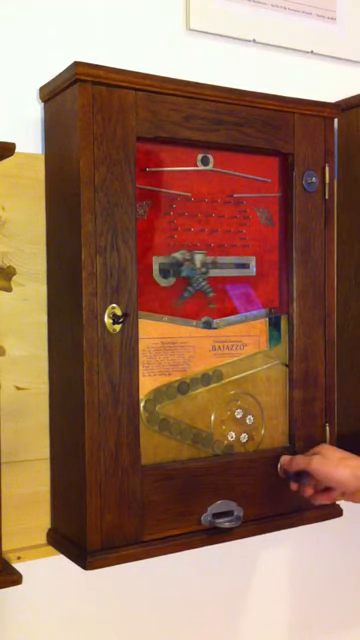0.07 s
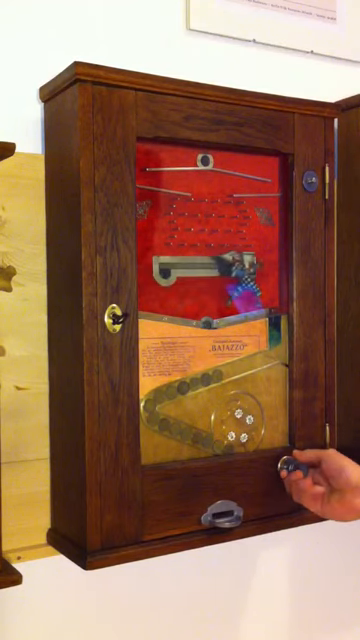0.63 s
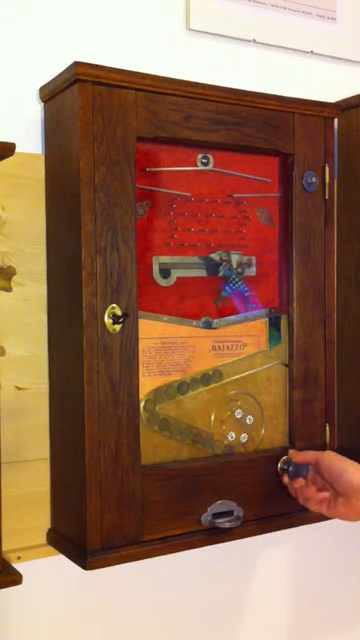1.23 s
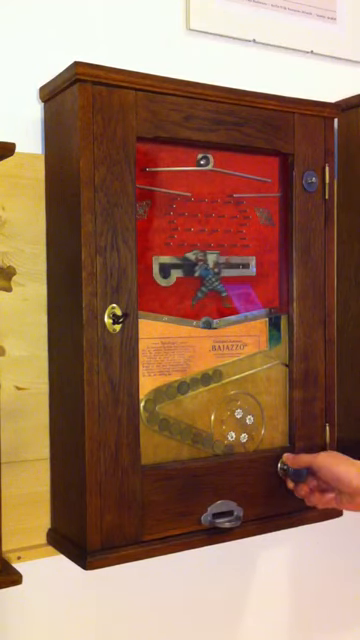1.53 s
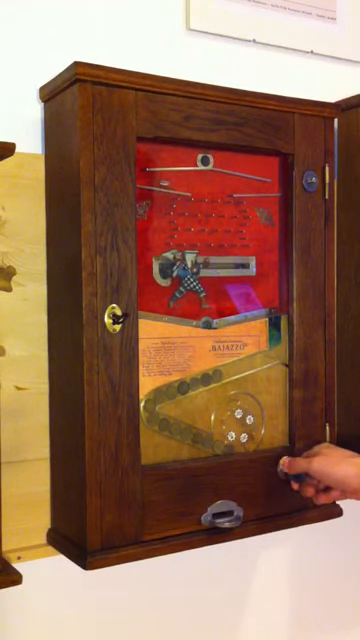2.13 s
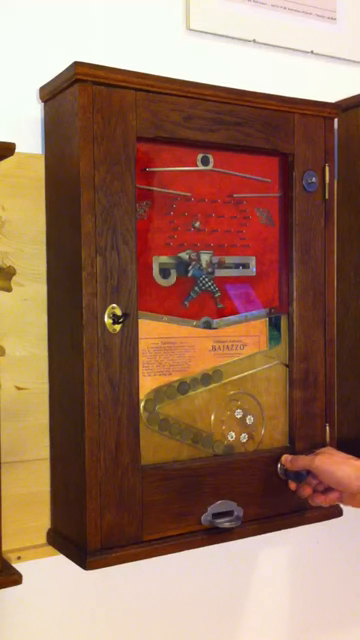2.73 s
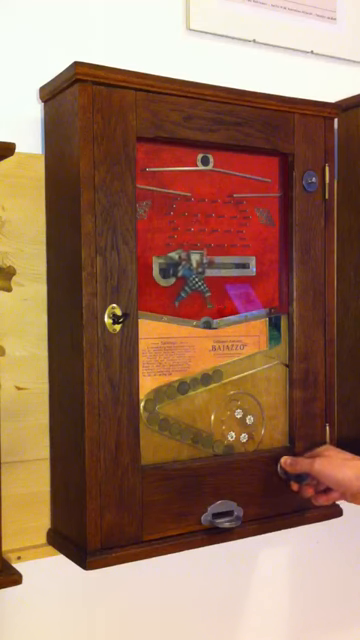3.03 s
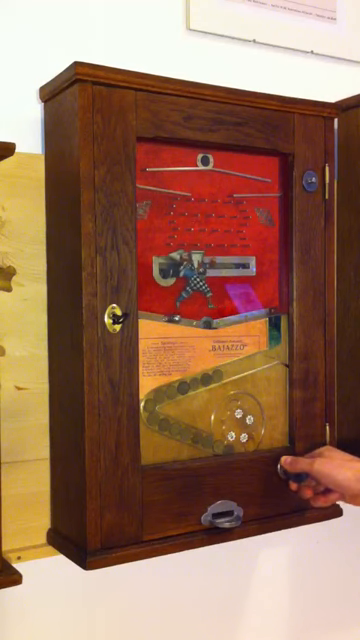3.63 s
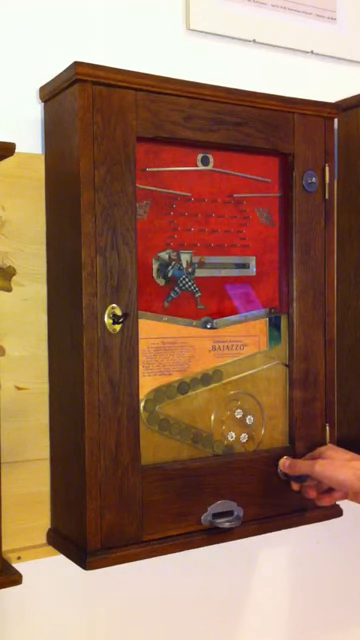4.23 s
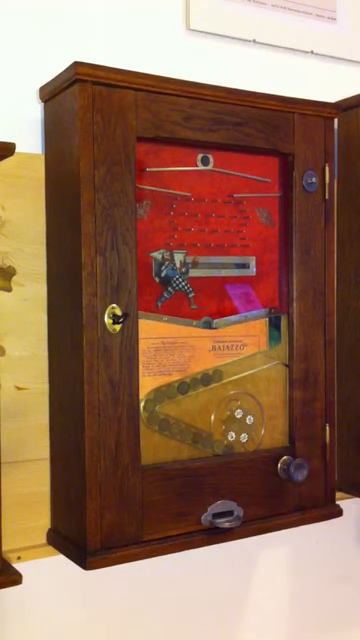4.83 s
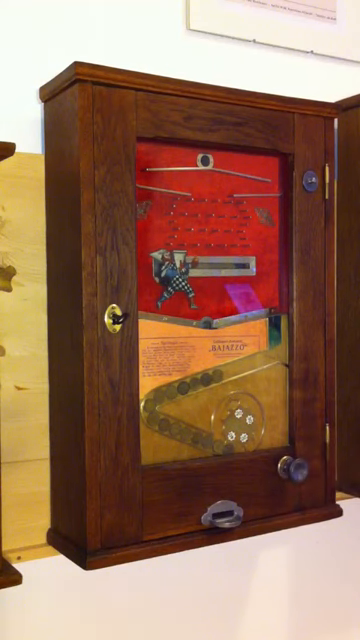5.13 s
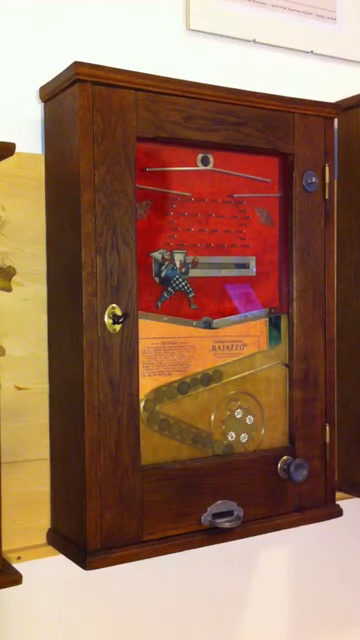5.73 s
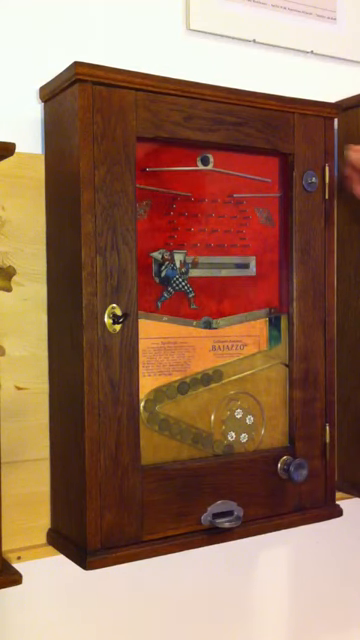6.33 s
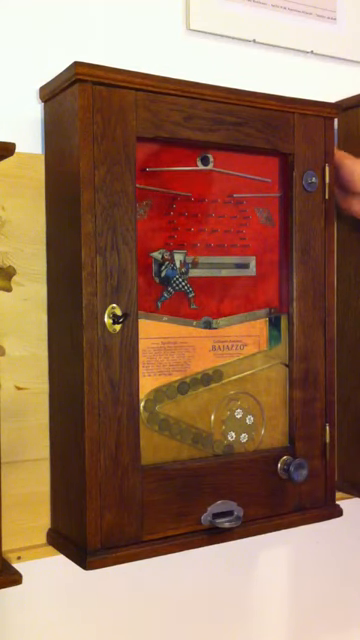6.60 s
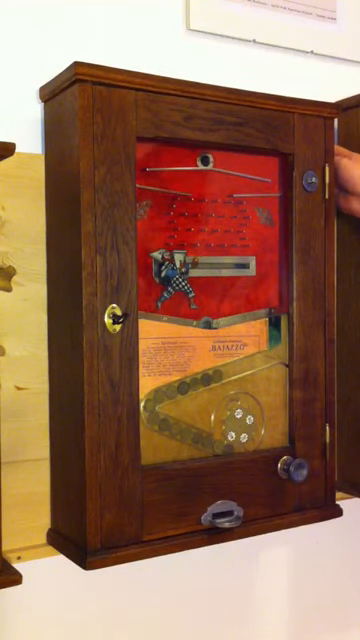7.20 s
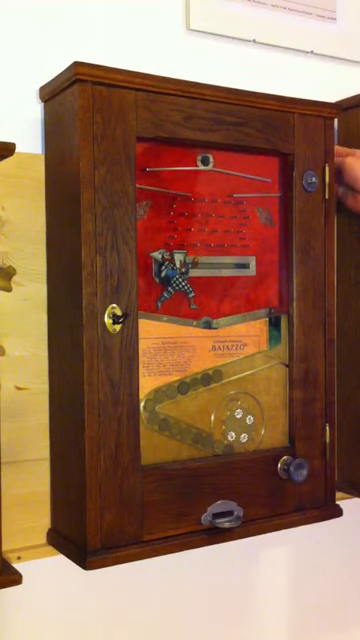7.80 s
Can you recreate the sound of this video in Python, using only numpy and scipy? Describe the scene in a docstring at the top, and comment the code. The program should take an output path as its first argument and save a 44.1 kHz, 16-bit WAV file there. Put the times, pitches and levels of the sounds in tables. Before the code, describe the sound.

An old wooden coin game is heard from about a metre away in a bare, quiet room with a short echo. From 0.4 seconds, levers click and knock hollowly inside the case, with faint metal scraping. At 1.4 seconds a steel ball is freed with a sharp, ringing clink, followed by a lighter one and a knock near 2.1. The ball lands on a rail at 2.4, rolls with a brief rumble and thin ring, and ticks through pins around 2.8 to 3 seconds. At 3.3 it drops onto metal with the loudest clack, then bounces with smaller clinks until about 4.4. Levers knock at 4.6 and rattle to rest around 5.1. After a lull with only faint hush, a coin clicks lightly in the slot from 6.7 seconds and clatters down the chute at about 7.4 and again near 7.9.

```python
"""A bare, quiet room, with one small microphone a metre from an old coin game in an oak wall cabinet.
A knob slides the catcher and frees a steel ball, which rolls down rails, ticks through pins and drops
onto metal, ringing each part it strikes. Levers knock inside, with the case as their sounding board.
At the end a hand feeds a coin into the slot at the side, and it clatters down the chute."""
import sys
import numpy as np
from scipy import signal
from scipy.fft import rfft, irfft
from scipy.io import wavfile
from scipy.ndimage import uniform_filter1d, map_coordinates

SR = 44100
rng = np.random.default_rng(int(sys.argv[2]) if len(sys.argv) > 2 else 0)


def master(y):
    """Save y as 16-bit WAV."""
    cut = np.clip(np.atleast_2d(y).T, -1, 1)
    pcm = np.round(cut * 32767)  # scale
    wavfile.write(sys.argv[1], SR, pcm.astype(np.int16))


N = 351036
T = np.arange(N) / SR
RING = T[:SR // 5]  # time axis of one ring-out, in seconds


# The ball's strikes, with a quick slap just after the two hardest (at 1.433 and 3.3156 s), probably
# off a nearby wall. At 2.4215 s the ball lands on the steel rail, which rings like the pins.
# Each row: start in seconds, strength in dB, kind of ring.
STRIKES_AND_SLAPS = [(1.4257, -26.5, "launcher"), (1.433, -53, "launcher"), (1.6262, -40.5, "launcher"),
                     (2.4215, -39, "pin"), (2.816, -46, "pin"), (2.8905, -45, "pin"), (2.982, -45, "pin"),
                     (3.3064, -24.5, "tray"), (3.3156, -43, "tray"), (3.4001, -35.5, "tray"),
                     (3.9069, -48, "tray"), (3.9503, -34.5, "tray"), (4.0747, -34.5, "tray"),
                     (4.384, -49, "tray")]
# Resonances of the steel parts. Each row: pitch in Hz, width in Hz, relative level in dB.
LAUNCHER_MODES = [(2750, 50, -7), (3425, 70, -3), (4290, 25, 2), (4348, 25, 1), (5030, 150, -3),
                  (5230, 80, 1), (6205, 20, 3), (6260, 30, 1), (7280, 70, -2), (9400, 200, -5)]
PIN_MODES = [(2620, 60, -1), (3520, 60, 1), (5240, 45, 1), (6740, 110, -4), (6915, 80, -2), (7220, 70, -1)]
TRAY_MODES = [(2555, 60, -5), (3410, 40, -4), (3645, 40, -3), (4543, 16, 4), (5220, 70, 0), (5390, 70, -3),
              (6900, 45, 3), (7223, 22, 7), (7349, 25, 1), (8756, 35, -1), (9471, 70, -2), (11601, 40, -6)]
STEEL_RINGS = {"launcher": LAUNCHER_MODES, "pin": PIN_MODES, "tray": TRAY_MODES}
# Spectra of board, steel contact and loose metal. Each row: frequency in Hz, relative level in dB.
CLACK_SPECTRUM = [(450, -28.5), (850, -12), (1200, 6), (1800, 8.5), (2500, 9), (3600, -11.5)]
CRACK_SPECTRUM = [(1700, -23.5), (2700, 5), (4300, 4), (5250, 14), (6200, 7), (7150, 14), (10000, -20)]
SPARKLE_SPECTRUM = [(6000, -24.5), (8300, 9), (9500, 7.5), (12200, 2), (14000, -18.5)]

def ball_strikes():
    """Hard contacts ring the steel, thump the board and set loose metal sizzling; two slaps follow."""
    out = np.zeros(N)
    for start, ring_db, kind in STRIKES_AND_SLAPS:
        force_db = ring_db + 24  # zero at a full strike
        # a stronger strike is a shorter contact, so the treble grows faster than the bass
        thud_db = -38 + 0.78 * force_db
        clack_db = -33.5 + 0.89 * force_db
        sparkle_db = -27.5 + 1.67 * force_db
        cutoff_hz = 38300 * 2 ** (force_db / 7.5)  # a gentle touch misses the highest modes
        chatter = contact(ms=15)
        thud = excite(chatter, modes(CABINET_MODES), thud_db)
        clack = excite(chatter, colour(CLACK_SPECTRUM), clack_db)
        ring = amp(ring_db - 5) * modes(STEEL_RINGS[kind])
        crack = excite(contact(ms=2.6), colour(CRACK_SPECTRUM), ring_db - 0.8)
        steel = cut(ring + crack, cutoff_hz, "low")
        sizzle = excite(contact(ms=8), jingle(SPARKLE_SPECTRUM), sparkle_db)
        add(out, start, amp(31) * (thud + clack + steel + sizzle))
    return out


# The ball runs along the rail, trickles through the pins and circles in the catcher's cup.
# Each row: start and end in seconds, then rumble, rail ring and hiss in dB.
BALL_RUNS = [(2.555, 2.72, -41.5, -52, -58.5), (2.8, 3.05, -47, -53.5, -74), (3.11, 3.215, -40, -40.5, -67)]
# The rail's resonances. Each row: pitch before bending in Hz, width in Hz, relative level in dB.
RAIL_MODES = [(2720, 260, -7), (3030, 260, 0)]
# They bend as the ball goes on. Each row: time in seconds, pitch ratio.
RAIL_BEND = [(2.6, 1.02), (2.78, .97)]
# Hiss at the rolling contact. Each row: frequency in Hz, relative level in dB.
HISS_SPECTRUM = [(1000, -13), (2000, -9.5), (4500, -11.5), (8000, -13.5), (12500, 4), (15500, 10)]

def ball_rolling():
    """The ball's bumps drum on the case, make the rail ring and hiss at the contact."""
    rumble, ring, hiss = strokes(BALL_RUNS, attack_s=0.014, sag_db_per_s=15.5, release_db_per_s=223)
    bumps = grit(spread_db=4)
    board = modes(CABINET_MODES, damping=2) + 0.2 * through(contact(ms=1), colour(CLACK_SPECTRUM))
    case = level(through(bumps, board))
    # in the cup the ball runs more slowly: its rumble deepens and the rail falls silent
    in_cup = np.interp(T, [3.09, 3.12], [0, 1])
    cup = colour([(90, -19), (150, 4), (350, 3), (550, -5.5), (1200, -19.5), (3000, -29.5)])
    body = (1 - in_cup) * case + in_cup * level(through(bumps, cup))
    rail_tones = through(grit(spread_db=7), modes(RAIL_MODES))
    rail = (1 - in_cup) * level(glide(rail_tones, RAIL_BEND))
    treble = level(through(bumps, colour(HISS_SPECTRUM)))
    return rumble * body + ring * rail + hiss * treble


# Catches on the fast run. Each row: start in seconds, opening pitch in Hz, relative level in dB.
RAIL_CATCHES = [(2.562, 14800, -51), (2.6, 14000, -53), (2.638, 13100, -46.5), (2.676, 11300, -45.5),
                (2.715, 12100, -46.5)]

def ball_skips(width_hz=1500, rattle_s=0.022, sag_per_s=2):
    """Once a turn the ball catches on the rail: a fine tick, then a broken rattle sinking in pitch."""
    out = np.zeros(N)
    for start, hz, db in RAIL_CATCHES:
        rattle = grit(spread_db=8)[:len(RING)] * np.exp(-RING / rattle_s)
        push = unit(contact(ms=1.2) + amp(3) * unit(rattle))
        ring = through(push, modes([(hz, width_hz, 0)]))
        ring = cut(ring, 8500, "high", order=4)
        sinking = map_coordinates(ring, [np.cumsum(np.exp(-sag_per_s * RING))], order=5)
        add(out, start, amp(db + 24) * unit(sinking))
    return out


def rail_song(hz=3137, start_s=2.56, peak_s=2.67, end_s=2.73):
    """Under the fast-running ball the rail sings one thin, wavering note that swells and dies."""
    swell = np.interp(T, [start_s, peak_s, end_s], [.6, 1, 0], left=0)
    drift = uniform_filter1d(rng.standard_normal(N), size=700)
    waver = level(uniform_filter1d(drift, size=700))
    phase = 2 * np.pi * np.cumsum(hz + 8 * waver) / SR
    return amp(-44 + 2.5 * waver) * swell * np.sin(phase)


# Levers and wood knock; the row at 3.3145 s is a quick slap after the ball's hardest strike, probably
# off a nearby wall. Each row: start in seconds, strength in dB, hardness in dB, rattle in ms.
KNOCKS_AND_SLAP = [(0.336, -68.5, -11, 3.3), (0.404, -46, -2, 14), (0.793, -49, -10, 6.2),
                   (0.802, -46, 4.5, 3.9), (0.829, -43.5, -5.5, 14.6), (0.889, -47, 1, 5.2),
                   (0.921, -40, -2.5, 15), (0.933, -53, 9.5, 3), (1.115, -46, 0, 36),
                   (1.399, -45.5, -0.5, 6.9), (2.128, -42, -3, 20), (2.421, -40.5, -3, 8.8),
                   (2.445, -43, -2.5, 4.4), (3.165, -45, -3.5, 6.7), (3.284, -42, -5, 12),
                   (3.3145, -29.5, 7.5, 7.3), (4.482, -60.5, 6, 6.1), (4.564, -47, -4, 7.6),
                   (4.679, -58, -3.5, 5.5), (5.058, -41.5, -2, 37), (5.094, -44.5, -2.5, 26)]
# Resonances of the oak case and its levers. Each row: pitch in Hz, width in Hz, relative level in dB.
CABINET_MODES = [(136, 37.2, 0.5), (169.8, 48, 4.5), (195, 190, -9.5), (280.7, 7.3, 8.5), (337, 84, 3),
                 (412, 79, 4), (575.7, 44, 4.5), (678.5, 38, 3), (800, 180, -4)]
LEVER_MODES = [(961, 240, 6), (1067, 310, 9.9), (1420, 590, 5.7), (1870, 190, 3)]

def levers():
    """The levers knock and sound the oak case; one slap has the same timbre."""
    return knocks(KNOCKS_AND_SLAP, CABINET_MODES, LEVER_MODES, mix_db=(-0.5, -2, 0.5, -5), gain_db=25.5)


# The coin, round at the side. Each row: start in seconds, strength in dB, hardness in dB, rattle in ms.
COIN_KNOCKS = [(6.707, -50.5, 4.5, 10.4), (6.948, -54.5, 7, 7.4), (7.248, -66.5, 6, 4),
               (7.405, -57, -3, 2.9), (7.419, -46.5, -1.5, 13.4), (7.436, -47.5, -1, 11.5),
               (7.464, -48.5, -3.5, 27), (7.501, -47.5, 12.5, 3.6), (7.822, -47, 1, 6), (7.9, -49, 14, 8.5),
               (7.911, -41, 6.5, 12)]
# Resonances of the side panel and slot. Each row: pitch in Hz, width in Hz, relative level in dB.
PANEL_MODES = [(319, 21, 1), (475, 114, 3.1), (693, 103, 4), (880, 174, 3.5)]
SLOT_MODES = [(1350, 115, 11), (1760, 133, 8.5), (1940, 67, 3), (2990, 150, -3)]

def coin():
    """The coin clicks in its slot and clatters down the chute, sounding the side panel."""
    return knocks(COIN_KNOCKS, PANEL_MODES, SLOT_MODES, mix_db=(-1.5, -3, 1.5, -10.5), gain_db=27)


# Spectra of metal edges meeting. Each row: frequency in Hz, relative level in dB.
TICK_SPECTRUM = [(1700, -18), (2700, 7.5), (3600, 6.5), (4500, 4), (7500, 1.5), (10000, -17.5)]
JINGLE_SPECTRUM = [(5000, -23.5), (8300, 10), (11000, 4.5), (14200, 3), (15600, -6)]
# Harder parts thud less and sparkle more. In order: thud, clack, tick, sparkle in dB per dB of hardness.
HARDNESS_SLOPES = (-1.69, -0.77, 0.11, 1)

def knocks(table, wood, metal, mix_db, gain_db):
    """Loose parts chatter as they meet: the wood thuds, the metal clacks, the edges tick and jingle."""
    out = np.zeros(N)
    for start, db, hardness_db, rattle_ms in table:
        tilt_db = hardness_db * np.array(HARDNESS_SLOPES)
        thud_db, clack_db, tick_db, sparkle_db = db + np.array(mix_db) + tilt_db
        hit = contact(rattle_ms)
        thud = excite(hit, modes(wood), thud_db)
        ring = excite(hit, modes(metal), clack_db)
        clack = excite(contact(rattle_ms), colour(CLACK_SPECTRUM), clack_db - 4.5)
        tick = excite(contact(rattle_ms), colour(TICK_SPECTRUM), tick_db)
        sparkle = excite(hit, jingle(JINGLE_SPECTRUM), sparkle_db)
        add(out, start, amp(gain_db) * (thud + ring + clack + tick + sparkle))
    return out


# Parts that ring on after a knock.
# Each row: start in seconds, pitch in Hz, relative level in dB, seconds to fall by 60 dB.
RINGING_PARTS = [(0.404, 6200, -55.5, 0.038), (0.402, 9730, -54.5, 0.063), (0.799, 10870, -51, 0.035),
                 (0.801, 14100, -55, 0.05), (0.828, 8500, -48.5, 0.045), (0.92, 4510, -47, 0.034),
                 (1.018, 947, -49, 0.29), (1.398, 1798, -41, 0.043), (2.13, 1410, -47, 0.11),
                 (2.127, 3750, -49.5, 0.079), (2.126, 4690, -49.5, 0.02), (2.129, 9130, -55, 0.28),
                 (2.13, 11680, -55, 0.17), (3.283, 1770, -38.5, 0.019), (4.561, 1088, -52, 0.25),
                 (4.562, 2760, -53, 0.2), (5.057, 1960, -41.5, 0.007), (5.062, 2820, -58.5, 0.42),
                 (5.092, 11160, -47.5, 0.034), (5.093, 14020, -58, 0.05), (5.13, 345, -46, 0.28),
                 (6.708, 5310, -55, 0.012), (6.708, 1970, -59.5, 0.034), (6.709, 3370, -60.5, 0.0068),
                 (0.797, 546.5, -41.5, 0.054), (7.421, 13400, -48, 0.26), (7.703, 5100, -66, 0.2),
                 (7.821, 13400, -44.5, 0.093)]

def pings():
    """Springs, plates and the coin are jostled into ringing, each with a close cluster of tones."""
    out = np.zeros(N)
    for start, hz, db, t60 in RINGING_PARTS:
        pitches = hz + rng.uniform(-1, 1, 5) * min(hz * .025, 170)
        cluster = sum(np.sin(2 * np.pi * pitch * RING) for pitch in pitches)
        ring = through(cluster * np.exp(-np.log(1000) * RING / t60), contact(ms=13))
        add(out, start, amp(db + 31.5) * unit(ring))
    return out


# Catcher, ball and coin in their guides. Each row: start and end in seconds, rumble and scrape in dB.
GUIDE_STROKES = [(0.03, .05, -68, -70.5), (.66, .78, -74, -65), (.95, 1.05, -52, -55.5),
                 (1.16, 1.35, -58.5, -60.5), (1.95, 2.05, -75, -71), (4.03, 4.22, -55, -55),
                 (4.52, 4.6, -62, -64.5), (4.96, 5.05, -70, -70.5), (7.88, 7.96, -56.5, -53)]
# Dragging metal. Each row: frequency in Hz, relative level in dB.
SCRAPE_SPECTRUM = [(800, -27), (1300, 2), (1800, 6.5), (2400, -4.5), (4200, -4.5), (15000, -26.5)]

def sliding(attack_s=0.13, release_db_per_s=136.5):
    """Metal drags in its guides, with the case as a sounding board."""
    drags = strokes(GUIDE_STROKES, attack_s, sag_db_per_s=23, release_db_per_s=release_db_per_s)
    # the hand on the knob keeps the works stirring faintly until they settle
    stir = strokes([(0, 5.1, -72, -80.5)], attack_s, sag_db_per_s=0, release_db_per_s=release_db_per_s)
    rumble, scrape = drags + stir
    bumps = grit(spread_db=3)
    case = level(through(bumps, modes(CABINET_MODES)))
    return rumble * case + scrape * level(through(bumps, colour(SCRAPE_SPECTRUM)))


# The catcher on its bar, later the coin in its slot. Each row: start and end in seconds, level in dB.
EDGE_RASPS = [(0.69, 0.79, -64.5), (7.195, 7.208, -59), (7.255, 7.27, -58), (7.64, 7.8, -73)]
# Resonances of those edges. Each row: pitch in Hz, width in Hz, relative level in dB.
EDGE_MODES = [(1750, 1450, 7), (3800, 380, 16), (6260, 690, 3)]

def rasping():
    """Metal is pushed along a metal edge in short jerks."""
    push, = strokes(EDGE_RASPS, attack_s=0.015, sag_db_per_s=13, release_db_per_s=397)
    return push * level(through(grit(spread_db=4), modes(EDGE_MODES)))


def swish(peak_s=5.445, width_s=0.022):
    """A faint, high brush of noise as the player moves round to the side."""
    swell = np.exp(-((T - peak_s) / width_s) ** 2)
    return amp(-65) * swell * level(cut(rng.standard_normal(N), 5000, "high"))


# The bare room's reverberation. Each row: frequency in Hz, seconds to fall by 60 dB.
ROOM_DECAY = [(120, 0.47), (600, 0.65), (3200, 0.67), (6400, 0.43), (12800, 0.35)]

def room(build_s):
    """Diffuse echoes build up quickly and lose their treble first."""
    hz = np.arange(SR // 2 + 1)
    octave = np.log2(np.clip(hz, 100, 12800) / 100)
    noise, t = rfft(rng.standard_normal(SR)), T[:SR]
    tail = 0
    for k in range(8):
        band = irfft(noise * np.clip(1 - abs(octave - k), 0, 1))
        t60 = on_log(100 * 2 ** k, ROOM_DECAY)
        tail = tail + band * np.exp(-np.log(1000) * t / t60)
    return unit(tail * (1 - np.exp(-t / build_s)))


# Quiet air around the microphone. Each row: frequency in Hz, relative level in dB.
AIR_SPECTRUM = [(25, -38.5), (55, -33), (134, -14.5), (230, -8.5), (569, -13.5), (2480, -21),
                (16000, -24.5)]

def room_tone():
    """A faint, steady hush lies under everything."""
    return amp(-70.5) * level(through(rng.standard_normal(N), colour(AIR_SPECTRUM)))


def modes(table, damping=1):
    """Decaying resonances; their strength varies with the place that is struck."""
    place_db = 1.5 * rng.standard_normal(len(table))
    ring = 0
    for k, (hz, width, db) in enumerate(table):
        gain = amp(db + place_db[k]) * (-1) ** k * width
        decay = np.exp(-np.pi * width * damping * RING)
        ring = ring + gain * decay * np.sin(2 * np.pi * hz * RING)
    return unit(ring)


def jingle(points, count=12):
    """A small metal part: a brief, very high ring at chance pitches, on top of its plain click."""
    pitches = np.geomspace(8000, 15000, count) * rng.uniform(.96, 1.04, count)
    click = np.pad(colour(points), (0, len(RING)))[:len(RING)]
    ring = through(click, modes([(hz, hz / 110, 0) for hz in pitches]))
    return unit(click + unit(ring))


def contact(ms):
    """A burst of tiny collisions that dies away and drives all pitches about equally."""
    fade = np.exp(-RING * 1000 / max(ms, .2))
    spectrum = rfft(rng.standard_normal(len(RING)) * fade)
    flat_burst = irfft(spectrum / np.abs(spectrum), len(RING))
    return unit(flat_burst * fade ** .25)


def grit(spread_db):
    """Dense bumps of uneven size, as of one surface running over another."""
    bumps = np.repeat(rng.standard_normal(N // 128 + 1), 128)[:N]
    return level(rng.standard_normal(N) * amp(spread_db * bumps))


def strokes(table, attack_s, sag_db_per_s, release_db_per_s):
    """Each movement gets going, slowly loses speed and runs out; one gain curve for each dB column."""
    out = 0
    for start, end, *levels_db in table:
        onset = np.clip(1 + (T - start) / attack_s, 0, 1)
        loss_db = sag_db_per_s * np.maximum(T - start, 0) + release_db_per_s * np.maximum(T - end, 0)
        out = out + np.outer(amp(levels_db), onset * amp(-loss_db))
    return out


def excite(hit, response, db):
    """The sound of a contact on a body, at a given strength."""
    return amp(db) * unit(through(hit, response))


def colour(points, size=2048):
    """Causal impulse response with a spectrum given as (Hz, dB) points."""
    hz = np.arange(size // 2 + 1) * SR / size
    cepstrum = irfft(np.log(amp(on_log(hz, points))))
    cepstrum[1:size // 2] *= 2
    cepstrum[size // 2 + 1:] = 0
    return unit(irfft(np.exp(rfft(cepstrum))))


def glide(x, ratios):
    """Bend the pitch of a steady sound along a curve."""
    speed = np.interp(T, *np.transpose(ratios))
    return map_coordinates(x, [np.cumsum(speed)], order=3, mode="wrap")


def cut(x, hz, kind, order=2):
    """A low-pass or high-pass."""
    return signal.sosfilt(signal.butter(order, min(hz, SR / 2 - 1), kind, fs=SR, output="sos"), x)


def on_log(hz, points):
    """Read (Hz, value) points on a log-frequency axis."""
    f, value = np.transpose(points)
    return np.interp(np.log(hz + 1), np.log(f), value)


def through(x, response):
    """Pass a sound through an impulse response."""
    return signal.fftconvolve(x, response)[:len(x)]


def add(out, start_s, x):
    """Mix a sound in at a time."""
    i = max(int(start_s * SR), 0)
    out[i:i + len(x)] += x[:N - i]


def amp(db):
    """Decibels to gain."""
    return 10 ** (np.asarray(db) / 20)


def unit(x):
    """Scale to an energy of one."""
    return x / np.sqrt(np.sum(x ** 2) + 1e-18)


def level(x):
    """Scale to an rms of one."""
    return unit(x) * np.sqrt(len(x))


def scene():
    """From a metre away the ball sounds through the glass; the works come more by way of the room."""
    ball = ball_strikes() + ball_skips()
    works = levers() + coin() + pings() + ball_rolling() + sliding() + rasping() + swish()
    out = ball + works + rail_song()
    out += through(ball + amp(2) * works, room(build_s=0.0016))
    add(out, 0.0093, amp(-7) * (ball + works))  # one early echo off a nearby wall
    out += room_tone()
    return np.array([out, out])


def record(dry):
    """A single small microphone that thins the deep bass and cuts the top."""
    bass_cut = signal.cheby1(9, .5, 123, "high", fs=SR, output="sos")
    top_cut = signal.ellip(10, .2, 70, 16050, fs=SR, output="sos")
    thinned = signal.sosfilt(bass_cut, dry) + amp(-16) * dry
    return signal.sosfilt(top_cut, thinned)


dry = scene()
out = record(dry)
master(out)
```